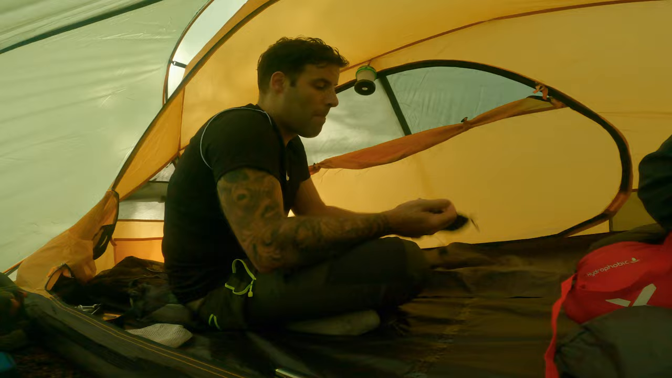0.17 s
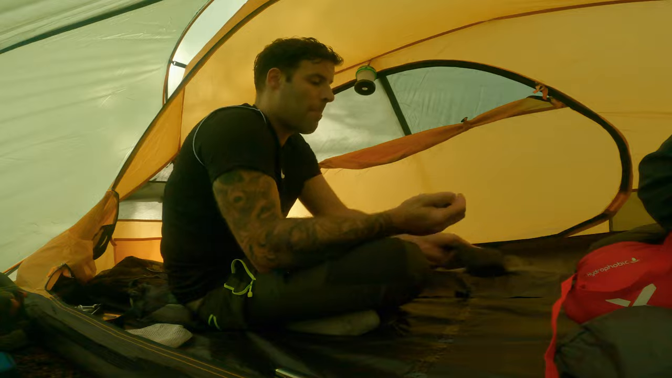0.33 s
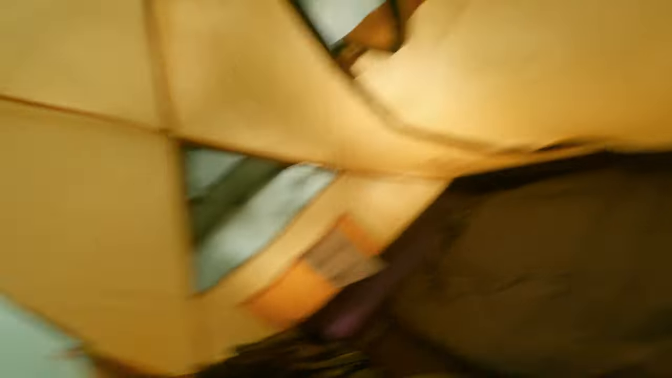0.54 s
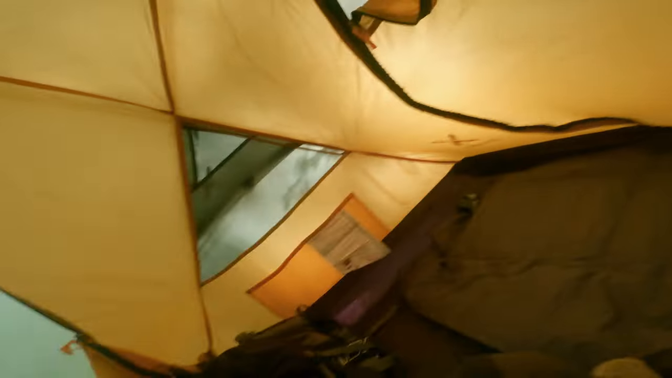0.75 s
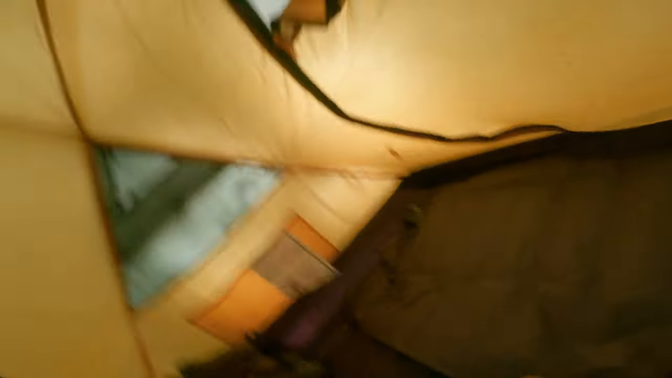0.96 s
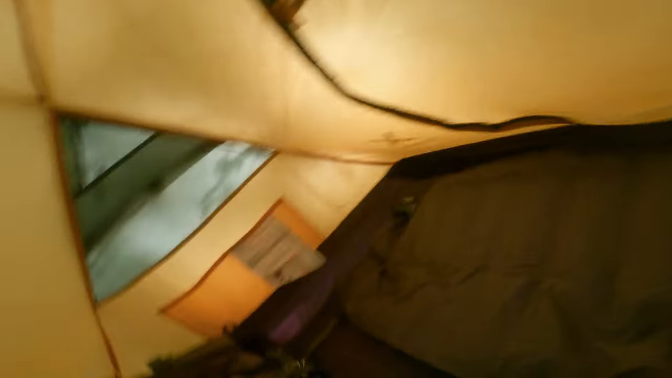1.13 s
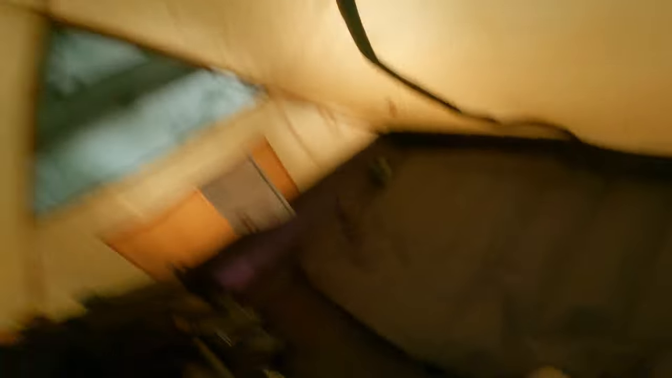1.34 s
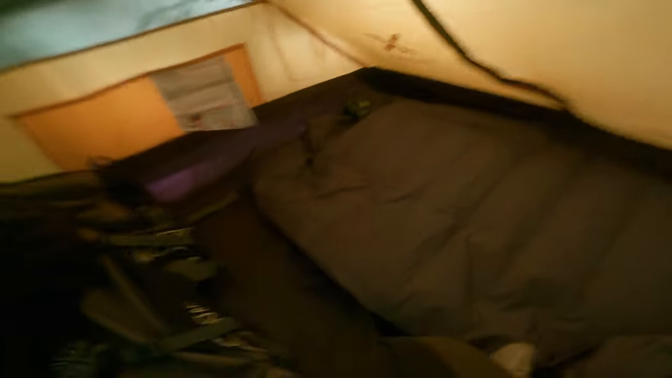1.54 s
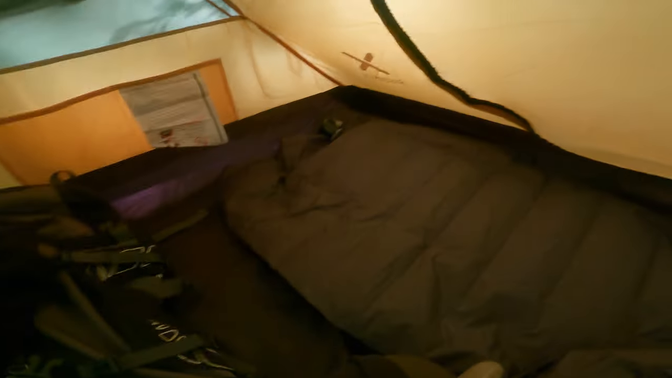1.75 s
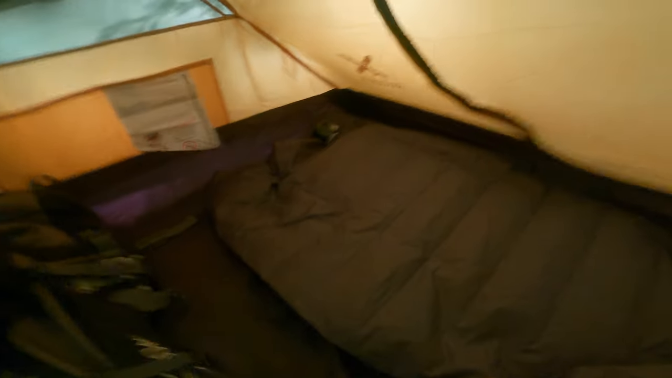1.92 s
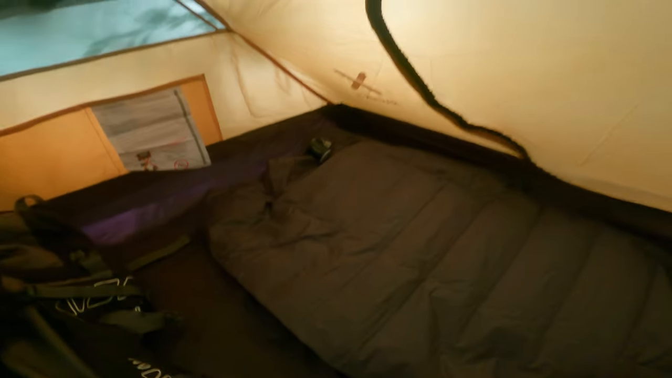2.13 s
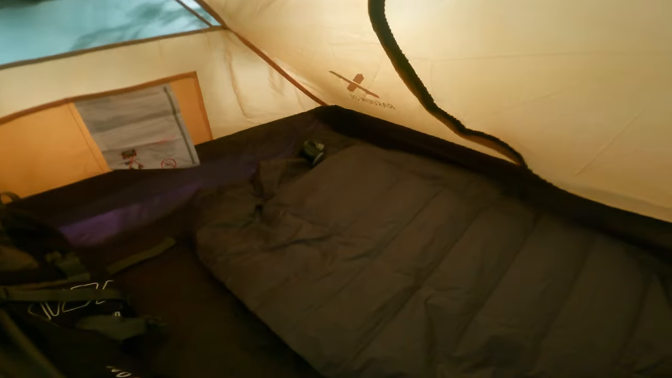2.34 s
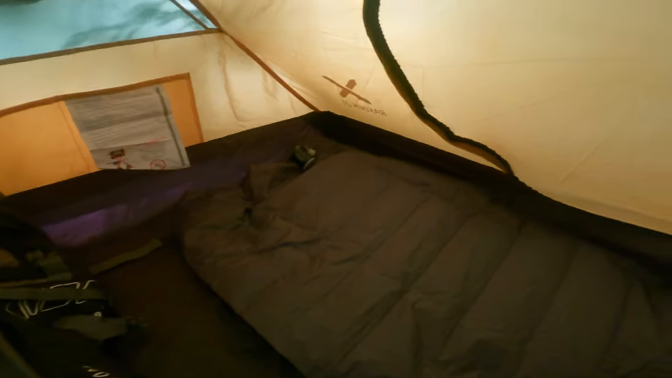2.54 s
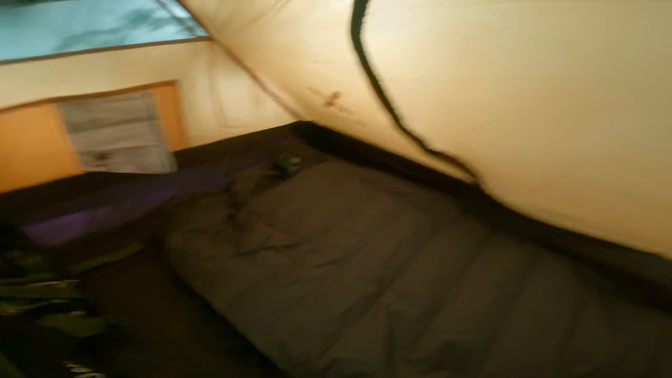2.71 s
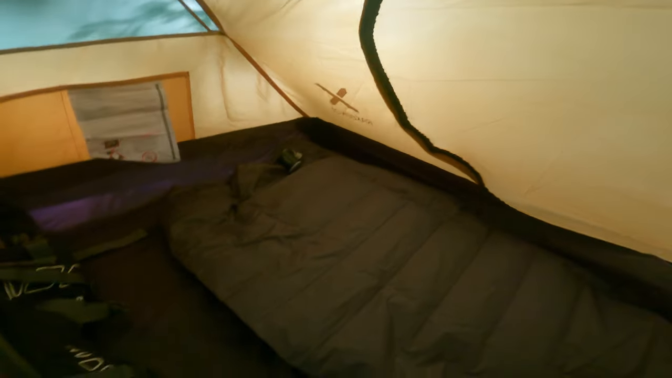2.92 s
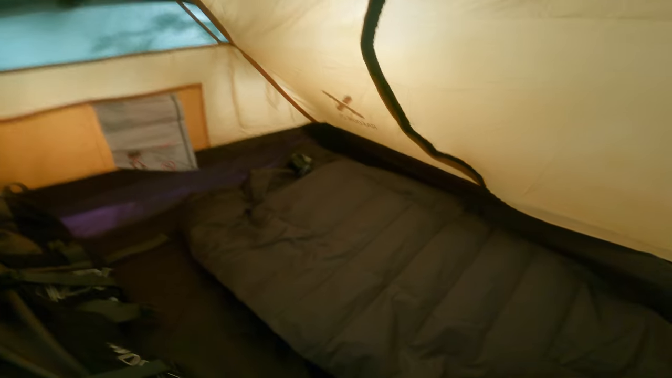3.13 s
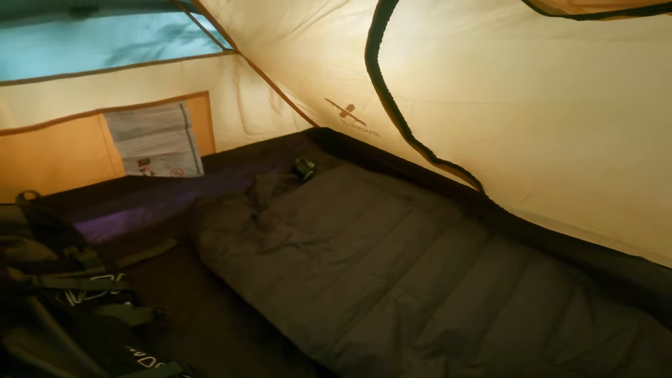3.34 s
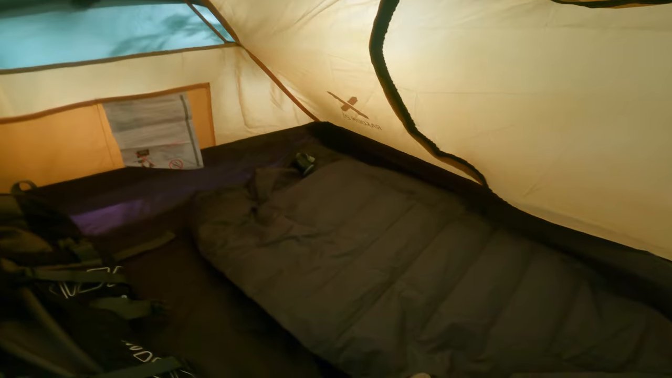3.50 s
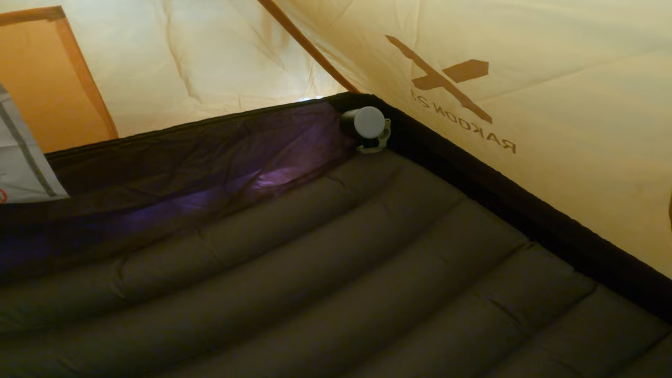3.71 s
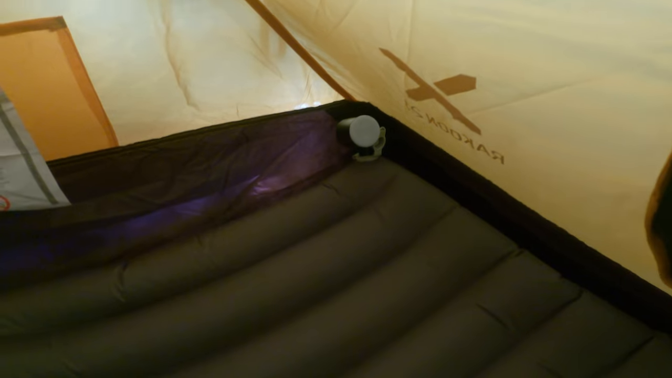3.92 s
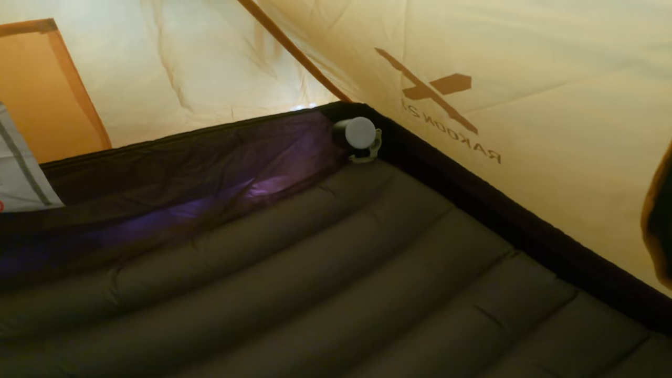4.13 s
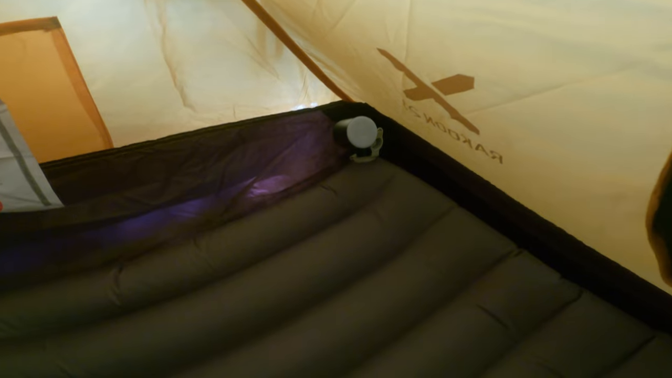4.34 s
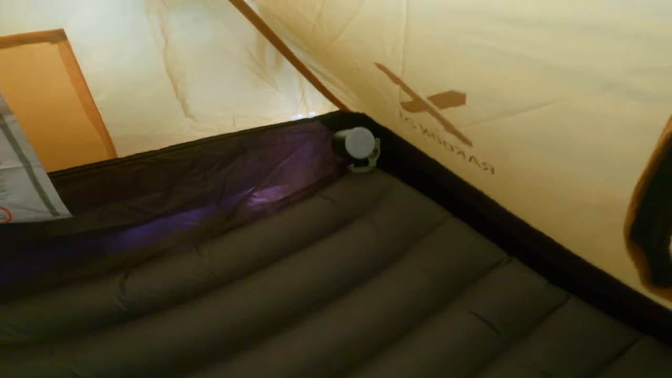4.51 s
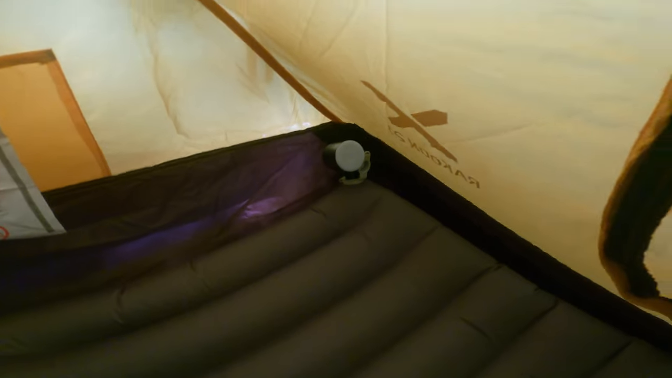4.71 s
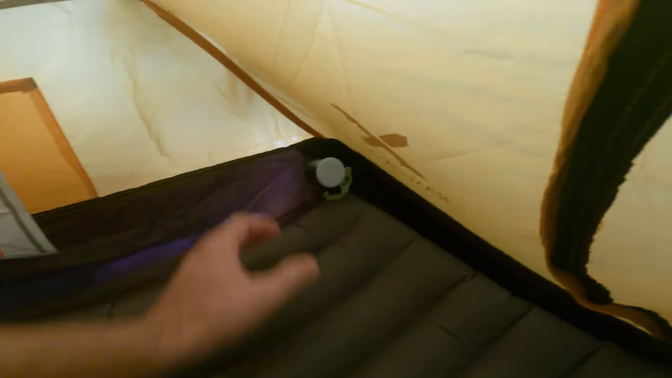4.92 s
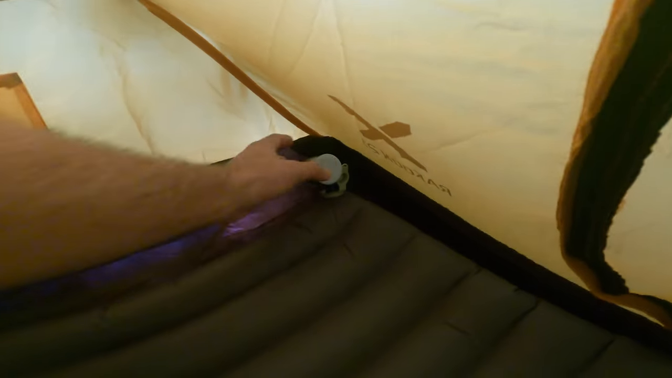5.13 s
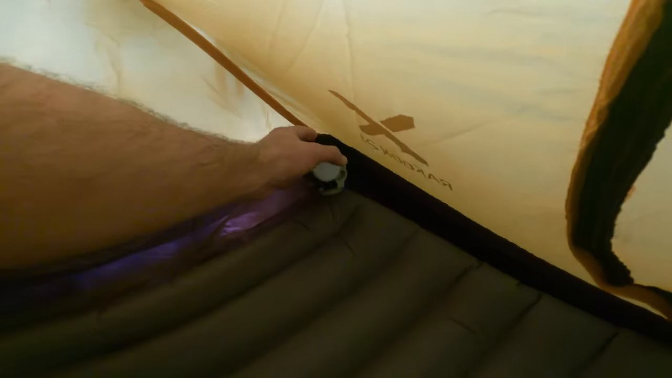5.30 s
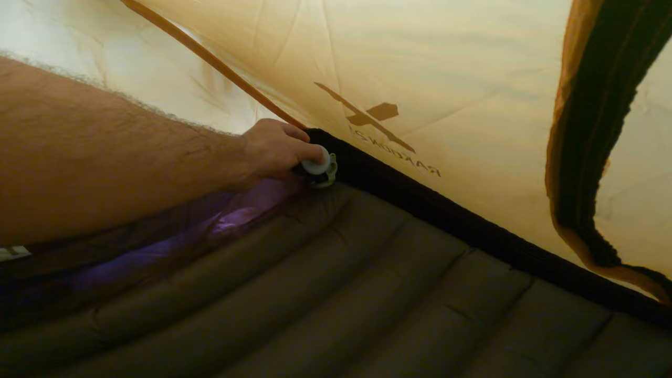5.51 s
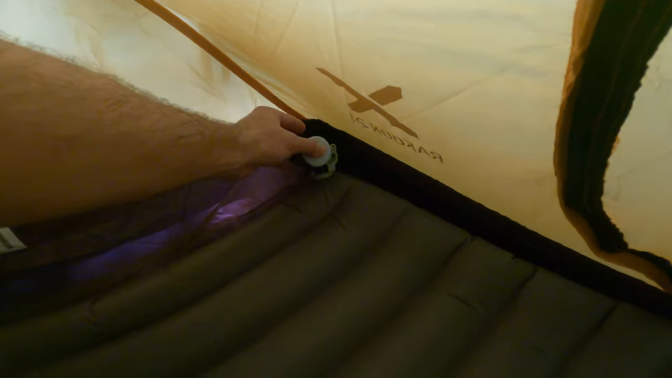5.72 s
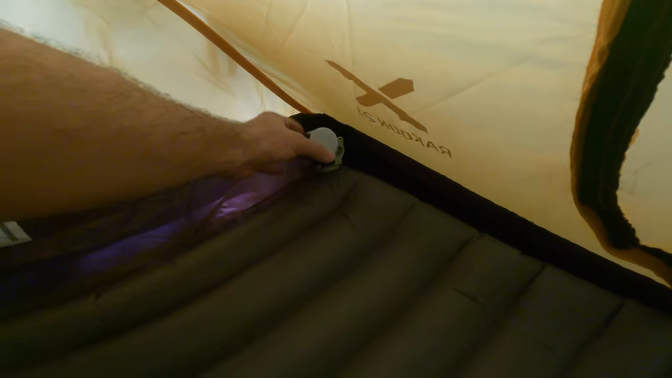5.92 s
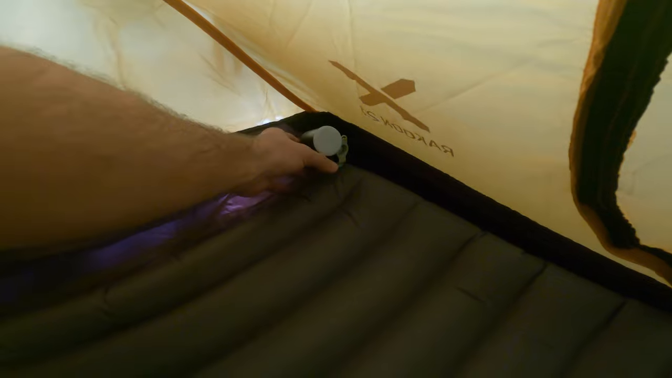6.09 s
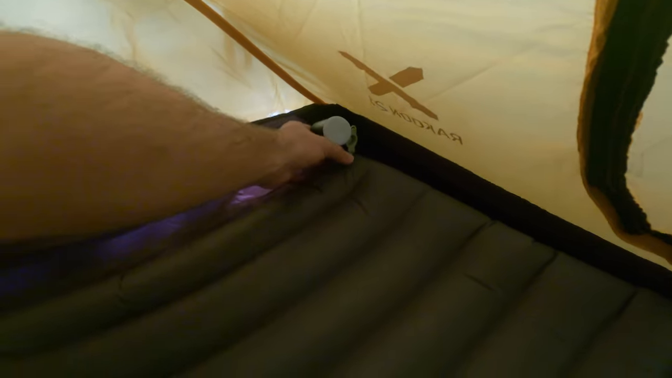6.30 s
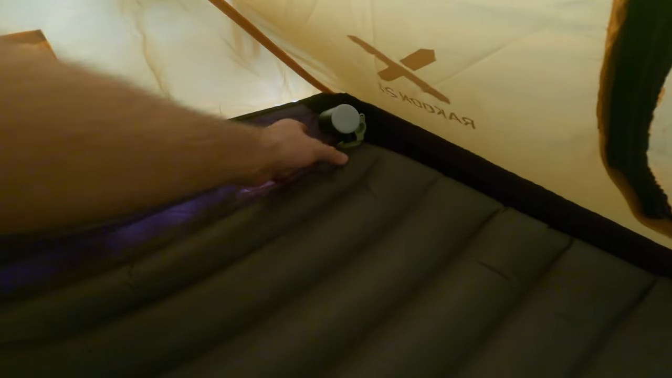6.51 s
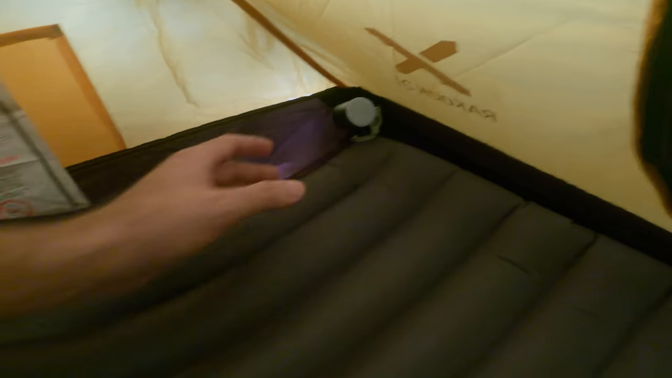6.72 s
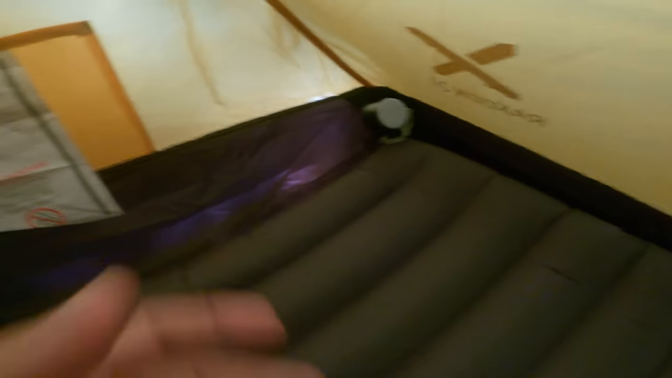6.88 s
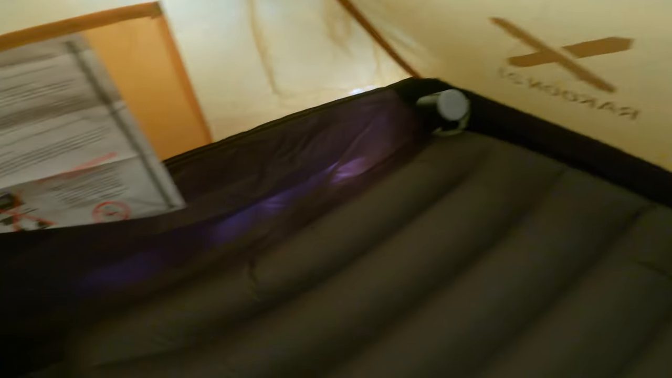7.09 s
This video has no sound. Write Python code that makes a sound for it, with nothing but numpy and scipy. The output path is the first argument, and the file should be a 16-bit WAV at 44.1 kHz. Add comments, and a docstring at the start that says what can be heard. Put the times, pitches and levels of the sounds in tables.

```python
"""A small air pump in a tent

A far engine drones while plastic parts click as a pump is unpacked. The pump then runs with rushing air
and a whine, first across the tent, where the hand-held microphone creaks and bumps, then close up under
back pressure. A hand reaches the button, and air squeezed past the fingers whistles thinly. Switched
off, the rotor slows with a rattle, and air slipping back through the valve whistles."""
import sys
import numpy as np
from scipy import signal
from scipy.fft import rfft, irfft
from scipy.io import wavfile
from scipy.ndimage import map_coordinates

SR = 44100
rng = np.random.default_rng(int(sys.argv[2]) if len(sys.argv) > 2 else 0)


def generate_wav(sig):
    """Save sig (samples, or channels by samples) to the path in sys.argv[1] as 16-bit PCM at SR."""
    pcm = np.round(np.clip(np.atleast_2d(sig).T, -1, 1) * 32767).astype(np.int16)
    wavfile.write(sys.argv[1], SR, pcm)


N = 315315
T = np.arange(N) / SR
HZ = np.maximum(np.fft.rfftfreq(N, 1 / SR), 1)
ACROSS_S, CLOSE_S, OFF_S = .4125, 3.75, 5.82   # pump heard across the tent, close up, switched off

# loudness as a hand shades the pump and it slows: t/s, blade tones/dB, wobble tone/dB, rattle/dB
ROTOR_LEVELS = [(0.42, 8, 0, -75), (0.65, 4, 0, -75), (0.85, 10, 0, -75), (1.1, 5, 0, -75),
                (1.4, -2, -1, -75), (2.2, 2, 2, -75), (3.74, -1, -1, -75), (3.76, 0, 0, -70),
                (5.25, 1, 1, -70), (5.33, -7, 0, -70), (5.45, 0, 0, -70), (5.6, 0, 0, -70),
                (5.8, 0, -8, -65), (5.95, 1, -14, -55), (6.05, -3, -14, -53), (6.13, -5, 5, -53),
                (6.3, -8, 3, -52), (6.55, -11, 1, -51), (6.7, -24, -7, -54), (6.9, -36, -5, -57),
                (7.0, -40, -8, -59), (7.15, -45, -30, -64)]


def amp(db):
    """Turn decibels into a gain."""
    return 10 ** (np.asarray(db) / 20)


def unit(x):
    """Scale to an average size (rms) of 1."""
    return x / np.sqrt(np.mean(x ** 2) + 1e-20)


def curves(rows):
    """Turn each column of a time table into a curve."""
    s, *columns = np.transpose(rows)
    return [np.interp(T, s, c) for c in columns]


def over_hz(points):
    """Spread a frequency table over all frequencies."""
    hz, value = np.transpose(points)
    return np.interp(np.log(HZ), np.log(np.maximum(hz, 1)), value)


def drift(rate):
    """A smooth random wander of size about 1, with rate new values a second."""
    count = int(N / SR * rate) + 2
    return map_coordinates(rng.standard_normal(count), [T * rate], order=3)


def colour(x, spectrum, peaks=()):
    """Filter by a spectrum and ringing peaks; white noise keeps its level."""
    peaks_db = sum(lift_db / (1 + (2 * (HZ - hz) / width) ** 2) for hz, width, lift_db in peaks)
    return irfft(rfft(x) * unit(amp(over_hz(spectrum) + peaks_db)), N)


def band(x, low_hz, high_hz):
    """Keep what lies between two frequencies."""
    return signal.sosfilt(signal.butter(2, [low_hz, high_hz], "band", fs=SR, output="sos"), x)


def ring(hits, hz, width):
    """Each hit starts a dying tone; more width makes it die sooner."""
    r, w = np.exp(-np.pi * width / SR), 2 * np.pi * hz / SR
    return signal.lfilter([0, np.sin(w)], [1, -2 * r * np.cos(w), r * r], hits + 1e-18)


def engine_drone():
    """A far engine hums at multiples of its firing rate."""
    # the engine's run: t/s, firing rate/Hz, level/dB
    firing = [(0.0, 141, -40), (0.06, 143.3, -33.5), (0.194, 140.6, -35), (0.23, 140.7, -39),
              (0.268, 142, -31), (0.304, 141, -42), (0.358, 142.5, -35), (0.398, 139.7, -44),
              (0.41, 139.3, -48)]
    # its tones: multiple of the firing rate, gain/dB
    overtones = [(.5, -4.5), (1, 0.5), (1.5, -22), (2, -42), (2.5, -21), (3, -29)]
    hz, level_db = curves(firing)
    phase = 2 * np.pi * np.cumsum(hz) / SR
    return np.sqrt(2) * sum(amp(level_db + db + drift(18)) * np.sin(k * phase + k) for k, db in overtones)


def outdoor_air():
    """Soft outdoor noise, mostly the same left and right."""
    # tone colour of the outdoors: f/Hz, level/dB
    spectrum = [(24, -38), (40, -23), (146, -10), (192, -15.5), (359, -14.5), (653, -31), (997, -23.5),
                (5430, -30.5), (7900, -38.5), (13700, -74), (15500, -95)]
    shared, left, right = colour(rng.standard_normal((3, N)), spectrum)
    return amp(-48) * (shared + .5 * np.array([left, right]))


def plastic_clicks():
    """Plastic parts click: dying bursts of noise, each with one strong pitch."""
    # the clicks: t/s, peak/dB, f/Hz, time to fade by 60 dB/s
    clicks = [(0.0327, -28, 2420, 0.044), (0.0732, -30.5, 2080, 0.038), (0.2817, -34, 1900, 0.034),
              (0.316, -12.5, 1730, 0.032), (0.3199, -25, 1810, 0.037), (0.3294, -31, 1730, 0.048),
              (0.348, -36, 2480, 0.037), (1.5845, -14, 1980, 0.011), (7.1324, -41, 3040, 0.045)]
    length = 4000   # samples
    out, age = np.zeros((2, N + length)), np.arange(length) / SR
    for s, db, hz, fade_s in clicks:
        noise = rng.standard_normal((3, length)) * amp(-60 * age / fade_s)
        burst = noise[0] + .5 * noise[1:]
        click = 1.6 * band(burst, hz * .76, hz * 1.14) + .5 * band(burst, 600, 8000)
        start = round(s * SR)
        out[:, start:start + length] += amp(db) * click / np.abs(click).max()
    return out[:, :N]


def turbulence(flicker_db):
    """Swirling air: two noises in which four pitch ranges flicker separately."""
    white, out = rfft(rng.standard_normal((2, N))), 0
    for low, high in [(0, 1200), (1200, 3400), (3400, 8400), (8400, SR)]:
        flicker = amp(flicker_db * (drift(9) + 1.25 * drift(30)))
        out = out + flicker * irfft(white * ((HZ >= low) & (HZ < high)), N)
    return out


def air_rush(low_db, treble_db, hiss_db):
    """Air rushes through the ringing case and duct; gives a direct and a scattered sound."""
    # tone colour of the rush, far and close: f/Hz, level/dB
    far_colour = [(150, -62), (250, -36), (450, -30), (624, -24.5), (995, -23.5), (1250, -13.5), (1950, 4),
                  (3450, -26), (4540, -24.5), (5400, -32.5), (5890, -27), (6200, -33), (9380, -36.5),
                  (11700, -35), (15500, -45.5)]
    near_colour = [(40, -68), (120, -27), (590, -26.5), (900, -17.5), (1600, -12), (1950, -11.5),
                   (2250, 0.5), (3200, -9.5), (3700, -22.5), (6300, -22.5), (8300, -24), (10400, -16.5),
                   (13000, -38), (14250, -33), (14700, -75)]   # the close sound is cut off above about 14 kHz
    # where case and duct ring, far and close: f/Hz, width/Hz, lift/dB
    far_peaks = [(2100, 560, -1), (4600, 130, 6), (2570, 1500, 2.5), (10350, 570, 10.5), (12800, 140, -2),
                 (7300, 870, 5)]
    near_peaks = [(992, 33, 5.7), (1640, 220, 10.3), (2264, 380, 5.4), (2675, 310, 4.8), (6760, 225, 10.5),
                  (7200, 144, 13), (7510, 130, 5.5), (9110, 86, 3.1), (10170, 290, 12.6), (11800, 100, 1.7),
                  (13300, 490, 15)]
    roar_db = .47 * treble_db * (T < CLOSE_S)   # across the tent the upper roar follows the treble
    air, rush = rfft(turbulence(flicker_db=.6)), 0
    for low, high, db in [(0, 1350, low_db), (1350, 2200, 0), (2200, 3500, roar_db),
                          (3500, 8400, treble_db), (8400, SR, hiss_db)]:
        part = irfft(air * ((HZ >= low) & (HZ < high)), N)
        far, near = colour(part, far_colour, far_peaks), colour(part, near_colour, near_peaks)
        rush = rush + amp(db) * np.where(T >= CLOSE_S, near, far)
    return rush


def rotor_whine(speed, turns):
    """Tones at multiples of the rotor speed swell and fade as reflections shift."""
    # motor and blade tones: multiple of the speed, far/dB, close/dB, slowing/dB
    tones = [(1, -54, -48, -49), (2, -56, -54, -62), (4, -62, -43, -55), (5, -56, -62, -60),
             (6, -48, -37, -48), (7, -51, -48, -41), (8, -66, -50, -58), (9, -45, -39, -38),
             (10, -69, -57, -62), (11, -80, -66, -54), (12, -72, -62, -50), (14, -77, -60, -58),
             (18, -55, -62, -54), (20, -60, -72, -62), (22, -71, -85, -64), (23, -73, -90, -66)]
    # what the case adds to a slowing tone at its pitch: f/Hz, gain/dB
    casing = [(1700, -30), (2050, -2), (2350, 10), (2900, 5), (3500, -2), (4300, -4), (5000, 2), (7000, -3),
              (9500, 0), (11000, -10), (13000, -30)]
    blade_db, wobble_db, _ = curves(ROTOR_LEVELS)
    slowing, out = np.clip((T - OFF_S) / .048, 0, 1), 0
    for k, far_db, close_db, slow_db in tones:
        swell_db = wobble_db + 1.2 * drift(6)   # the lowest tone is the unbalanced rotor's wobble
        if k > 1:
            slow_db = slow_db + np.interp(k * speed, *np.transpose(casing))
            swell_db = blade_db + np.where(T >= CLOSE_S, 2, 3) * drift(8)
        level_db = np.where(T >= CLOSE_S, close_db + slowing * (slow_db - close_db), far_db)
        out = out + amp(level_db + swell_db) * np.sqrt(2) * np.sin(2 * np.pi * k * turns + k)
    return out


def bearing_rattle(speed, turns):
    """Rough spots in the bearing tick once a turn and shake the shell."""
    # rough spots: place/turns, strength
    spots = [(0, 1), (.111, -.8), (.37, .6), (.68, -.5)]
    # where the shell rings: f/Hz, width/Hz, lift/dB
    shell = [(4000, 500, 3), (5100, 500, 5), (6200, 900, 6), (7700, 500, 3), (9700, 1400, 9),
             (10600, 600, 4)]
    ticks = sum(strength * (1 + .47 * drift(14)) * np.diff(np.floor(turns - place), prepend=-1)
                for place, strength in spots)
    ticks *= 1 + .35 * rng.standard_normal(N)   # no two touches alike
    ticks *= amp(curves(ROTOR_LEVELS)[2] + 2 * drift(20)) * np.sqrt(SR / speed)
    return colour(ticks, [(300, -60), (2500, -20), (3500, 0), (11000, -2), (14000, -20)], shell)


def pump():
    """Rush, whine and rattle; gives direct sound, scattered sound and how far aside the pump is."""
    # the rotor runs, then slows: t/s, turns a second/Hz
    rotor = [(0.42, 627.2), (0.84, 627.8), (1.02, 630.3), (1.3, 631.4), (1.6, 633), (2.45, 632.4),
             (2.85, 636.4), (3.4, 635.6), (3.749, 635.2), (3.75, 672.5), (4.5, 673), (4.68, 669.5),
             (5.1, 669.7), (5.6, 672), (5.82, 672), (5.9, 604.4), (6.0, 529.6), (6.1, 465.3), (6.2, 409.2),
             (6.3, 360.2), (6.4, 315), (6.5, 276.3), (6.6, 240), (6.7, 208), (6.8, 177), (6.9, 149),
             (7.0, 124), (7.15, 90)]
    # the airflow: t/s, level/dB, low boost/dB, treble boost/dB, hiss boost/dB, off to the side/0-1
    airflow = [(0.42, -26.5, 4.5, 11, 5, 0.5), (0.65, -26, 6, 12, 8, 0.62), (0.9, -25, 4, 11.5, 6, 0.55),
               (1.1, -25.5, 3.5, 9.5, 8, 0.5), (1.3, -28, 2, 9.5, 5.5, 0.48), (1.5, -31, 4.5, 8.5, 3, 0.28),
               (1.75, -24.5, 3, 5.5, -2, 0.02), (2.1, -25, 3.5, 5, 1, 0.01), (2.45, -25, 3.5, 3, 0, 0),
               (3.1, -27, 0, 9, 2.5, 0), (3.749, -25, 1, 2, 1, 0), (3.75, -21, -1, 3, 2.5, 0.4),
               (4.1, -21.5, 0.5, 2.5, 2, 0.4), (4.45, -20.5, -1, 1.5, 2, 0.41),
               (4.7, -23, 1.5, 5.5, 3, 0.42), (5.0, -20.5, -0.5, -1, -0.5, 0.48),
               (5.25, -20.5, -1.5, 1, -3.5, 0.42), (5.35, -19.5, 0, 2.5, 2, 0.4), (5.55, -23, 2, 5, 5, 0.4),
               (5.72, -25, 3.5, 7, 5, 0.37), (5.85, -23, 6, 5, 3, 0.37), (6.0, -22.5, 6, -1.5, -2.5, 0.4),
               (6.15, -25.5, 4.5, 2, -7, 0.36), (6.3, -28.5, 5.5, -5, -12, 0.42),
               (6.45, -36, 8.5, 0, -10, .5), (6.6, -39, 8, -9, -8, 0.45), (6.75, -47.5, 16, -4, 0, 0.5),
               (6.9, -50, 10, 0, 0, 0.5), (7.0, -56.5, 15, 13, 5, 0.66), (7.15, -62, 9, 15, 3, .7)]
    rush_db, low_db, treble_db, hiss_db, aside = curves(airflow)
    speed = curves(rotor)[0] * (1 + .001 * drift(25))
    turns, heard = np.cumsum(speed) / SR, T >= ACROSS_S
    motor = rotor_whine(speed, turns) + bearing_rattle(speed, turns)
    direct, scattered = amp(rush_db) * air_rush(low_db, treble_db, hiss_db)
    return (direct + motor) * heard, scattered * heard, aside


def grip_rumble():
    """The hand holding the microphone rumbles in lumps."""
    # loudness of the grip: t/s, level/dB
    grip = [(0.42, -36), (0.51, -43.5), (0.76, -42), (0.89, -43), (1.09, -52), (1.19, -48), (1.49, -48),
            (1.6, -46.5), (1.92, -41), (2.07, -48), (2.46, -53), (2.67, -55), (2.8, -49), (3.27, -61),
            (3.49, -62), (3.79, -57), (3.92, -52), (4.02, -53), (4.37, -57), (4.84, -58.5), (5.54, -64),
            (5.8, -53), (5.97, -66), (6.25, -77), (6.38, -58), (6.44, -67), (6.59, -56), (6.81, -61),
            (6.92, -52), (7.15, -61)]
    # its tone colour: f/Hz, level/dB
    spectrum = [(18, -48), (30, -31), (60, 1), (81, -3.5), (208, -4.5), (356, -17), (633, -22), (800, -30),
                (1040, -60), (1760, -120)]
    shared, left, right = colour(rng.standard_normal((3, N)), spectrum)
    spread = np.interp(T, [1.5, 2.2, 3.74, 3.76], [.76, .05, .05, .49])
    gain = amp(curves(grip)[0] + 4.8 * drift(18)) * (T >= ACROSS_S)
    return gain * (shared + spread * np.array([left, right]))


def bumps_and_creaks():
    """Bumps ring the microphone's case; a creak is a quick run of sticking and slipping."""
    # bumps: t/s, strength/dB, sharpness/dB, left over right/dB
    bumps = [(0.461, -44, -11, -3), (0.518, -40, -20, -13), (0.658, -43, -16, -4.0),
             (0.683, -22, -10.5, -4), (0.76, -26, -17, 6), (0.789, -27.5, -13, -9), (0.908, -36, -17, 2.0),
             (0.939, -24, -14, -1.0), (1.104, -36, -8, -11), (1.176, -9.5, -15.5, -3),
             (1.193, -10.5, -8.5, -11), (1.208, -8.5, -19, 2), (1.228, -16.5, -11, 4), (1.244, -27, -17, 5),
             (1.355, -31.5, -15, -10), (1.429, -30.5, -3, -10), (1.438, -14.5, -18, -6),
             (1.461, -31, -19, 11), (1.472, -34, -13, -3), (1.559, -37, -8, 2), (1.578, -33.5, 11, -9),
             (1.586, -37.5, 4, 7), (1.596, -36, -3, -21), (1.648, -38, -16, 0.5), (1.688, -30, -12, -3),
             (1.718, -32, -11, 3.0), (1.76, -31, -18, -0.5), (1.786, -28, -23, -1), (1.809, -37, -13, 0),
             (1.85, -27, -20, -2), (1.89, -30, -21, 0), (1.919, -45, -15, 0.5), (2.253, -29.5, -17, -1),
             (2.323, -36, -13, 0.5), (2.458, -50, -4, 0.5), (2.499, -42, 0, 1), (2.709, -42, -17, 0.0),
             (2.789, -27, -9, 0.0), (2.808, -27.5, -17, -4), (2.849, -51, 2, 0.0), (3.054, -39, -7, 0.0),
             (3.969, -42, 0, 0.5), (4.029, -41, -4, -1), (4.718, -40, 5.5, 0.0), (6.802, -35.5, -2.5, -9),
             (6.862, -42, 5.5, -8), (6.96, -38.5, 1, -10), (7.14, -26, -21, 8.0)]
    # creaks: start/s, end/s, slips/Hz, strength/dB, sharpness/dB, unevenness/0-1, stereo spread/0-1
    creaks = [(0.956, 1.073, 81, -12, -14, .06, 0.95), (1.988, 2.1, 94.0, -25, -24, 0.06, 0)]
    # dull and sharp tones of the case: f/Hz, width/Hz, level/dB
    thuds = [(86, 38, -7), (162.7, 74, 9), (280, 96, 4)]
    snaps = [(372, 33, -2.5), (605, 65, 5.5), (678, 47, 11.5)]
    blows = [(*bump, .4) for bump in bumps]   # .4 is the stereo spread
    for start, end, per_s, db, sharp_db, uneven, spread in creaks:
        early_late, force = rng.standard_normal((40, 2)).T
        times = start + (np.arange(40) + uneven * early_late) / per_s
        blows += [(s, db + 15 * uneven * f, sharp_db, -1, spread) for s, f in zip(times, force) if s < end]
    s, db, sharp_db, pan_db, spread = np.transpose(blows)
    gain, knocks = amp(db + np.array([[.5], [-.5]]) * pan_db), 0
    # the edge snaps up first, the case swings back after it
    for modes, shift_db, lag_s, push in [(thuds, 0, .0015, -.5), (snaps, sharp_db, 0, .5)]:
        for hz, width, mode_db in modes:
            hits, chance = np.zeros((2, N)), rng.standard_normal((len(s), 2)).T
            # left and right sit on different parts of the shaking case
            variation = 1 + .25 * chance[0] + spread * chance[1] * [[1], [-1]]
            hits[:, np.round((s + lag_s) * SR).astype(int)] = gain * amp(shift_db + mode_db) * variation
            knocks = knocks + push * ring(hits, hz, width)
    return signal.lfilter(*signal.butter(2, 1000, fs=SR), knocks)   # a touch lasts about a millisecond


def finger_whistle():
    """Air squeezed past the fingers makes a thin band of noise that climbs in pitch."""
    # the squeezed air: t/s, f/Hz, level/dB
    squeeze = [(5.3, 9000, -72), (5.55, 9050, -41), (5.85, 9030, -37), (6.1, 9400, -47), (6.3, 9500, -51),
               (6.4, 9650, -80)]
    hz, level_db = curves(squeeze)
    tone = np.sqrt(2) * np.sin(2 * np.pi * np.cumsum(hz) / SR)
    return amp(level_db) * drift(350) * tone * (T > squeeze[0][0])


def valve_whistle():
    """Air slipping back through the valve sings a nearly pure, breathy note."""
    # the note: t/s, f/Hz, level/dB, breath/dB
    note = [(5.95, 723.3, -46, -40), (6.01, 672, -29, -41), (6.026, 700.4, -29.5, -41),
            (6.18, 692, -21, -41), (6.304, 666.6, -21, -40), (6.64, 636, -30, -42), (6.688, 629, -47, -39),
            (6.704, 617.8, -40, -43), (6.778, 623, -40, -44), (6.788, 670, -40, -46),
            (6.804, 685, -48, -48), (6.818, 586.0, -47, -49), (6.844, 655, -56, -43),
            (6.864, 609.5, -45, -50), (6.882, 682, -57, -50), (6.966, 725, -49, -52),
            (6.988, 693.5, -50, -49), (7.15, 700, -53, -58)]
    hz, level_db, breath_db = curves(note)
    phase = 2 * np.pi * np.cumsum(hz * (1 + .0041 * drift(60))) / SR
    tone = np.sqrt(2) * amp(level_db + drift(70)) * (np.sin(phase) + amp(-28) * np.sin(2 * phase))
    breath = unit(band(band(rng.standard_normal(N), 608, 940), 380, 730))
    fade_in = np.clip((T - note[0][0]) / .016, 0, 1)
    return (tone + amp(breath_db) * breath) * fade_in


def scene():
    """Mix it all; a pump off to the side reaches left and right with unequal level and timing."""
    # level gap for sound from the side: f/Hz, left over right/dB
    lean = [(60, 4), (180, 0.0), (550, -5), (1650, -3), (4970, -2), (15000, 13.5)]
    # its timing gap: f/Hz, left ahead/radians
    lead = [(0, -0.063), (3360, -0.75), (3700, -0.51), (4050, -1.7), (4480, -1.3), (15200, -0.5)]
    direct, scattered, aside = pump()
    direct = direct + valve_whistle() + finger_whistle()
    half_gap = np.log(amp(over_hz(lean))) / 2 + .5j * over_hz(lead)
    side = irfft(rfft(direct) * np.sinh(half_gap), N) + .6 * scattered
    handling = bumps_and_creaks() + grip_rumble() + plastic_clicks()
    outdoors = (engine_drone() + outdoor_air()) * (T < ACROSS_S)
    return direct + aside * side * [[1], [-1]] + handling + outdoors


def record(dry):
    """The microphone adds hiss, cuts deep bass, rounds loud peaks and cuts the highest treble."""
    hiss = amp(-62) * band(rng.standard_normal((2, N)), 9000, 14000)
    wet = signal.sosfilt(signal.butter(3, 50, "high", fs=SR, output="sos"), dry + hiss)
    wet = .8 * np.tanh(wet / .8)
    return signal.sosfilt(signal.ellip(10, .5, 70, 15300, fs=SR, output="sos"), wet)


dry = scene()
out = record(dry)
generate_wav(out)
```